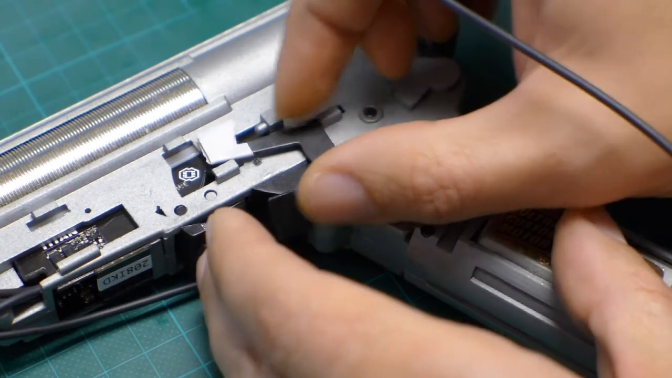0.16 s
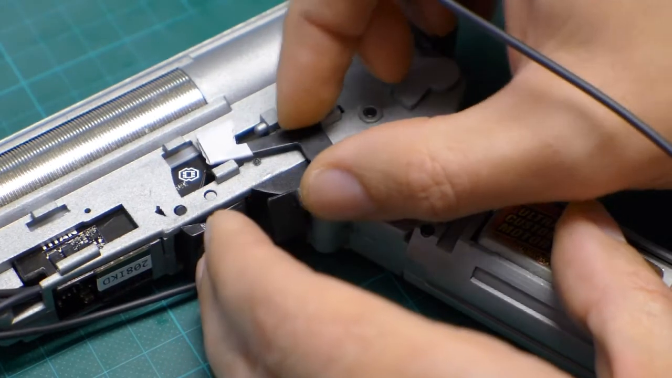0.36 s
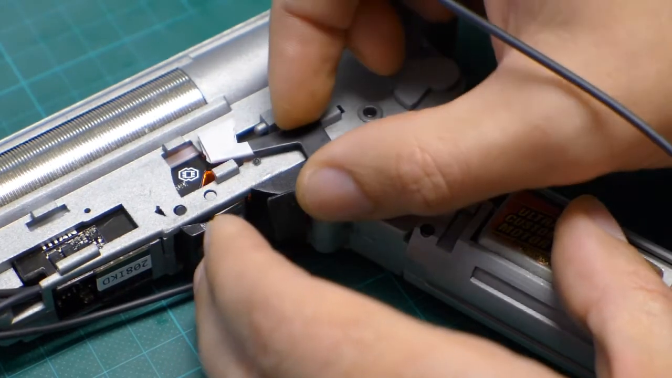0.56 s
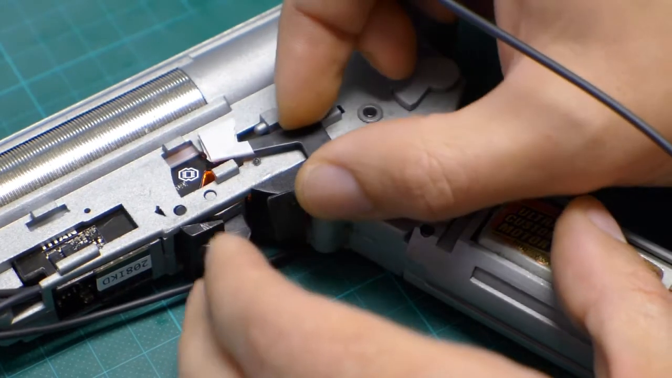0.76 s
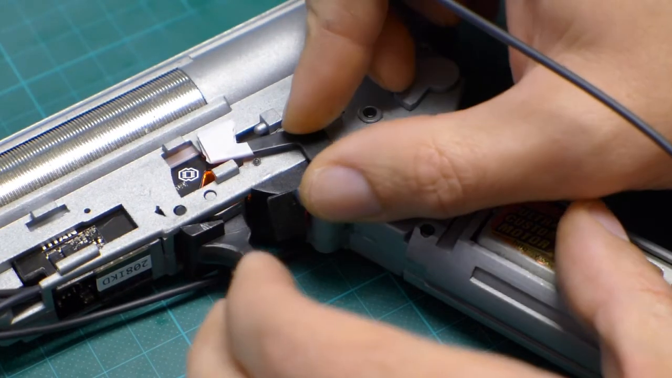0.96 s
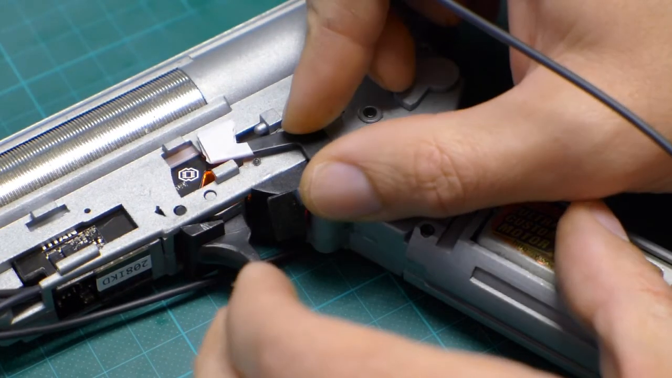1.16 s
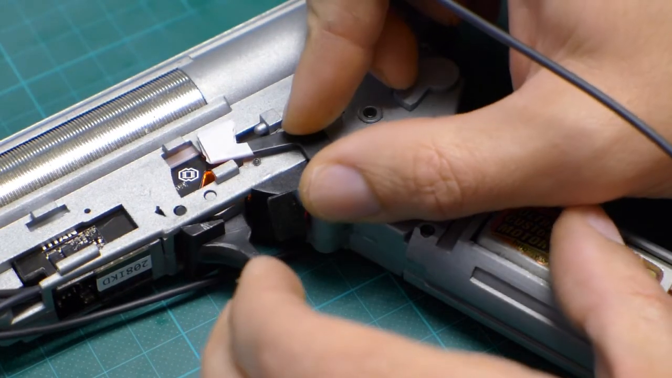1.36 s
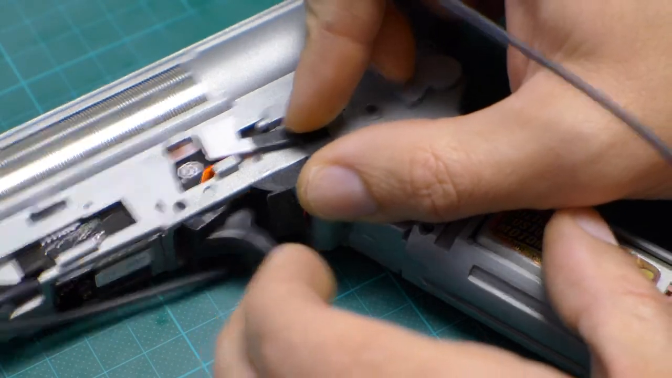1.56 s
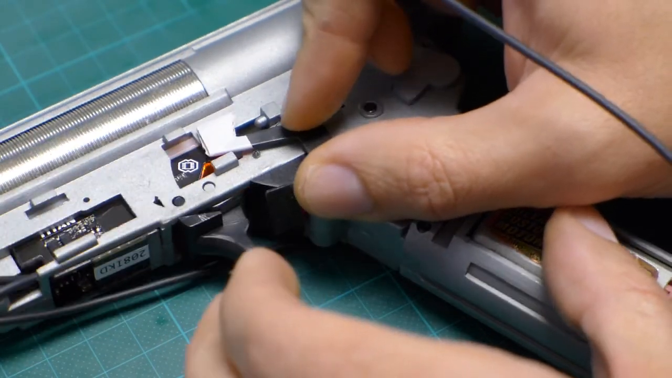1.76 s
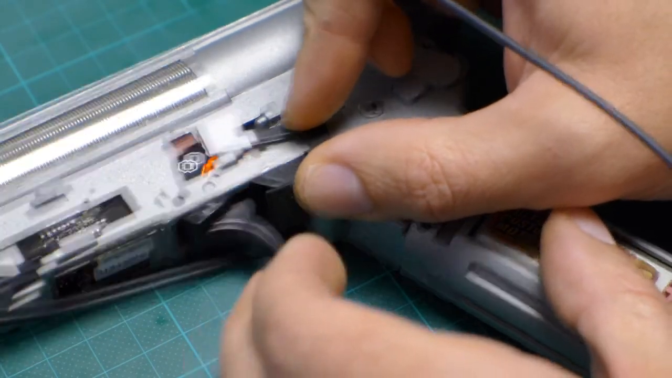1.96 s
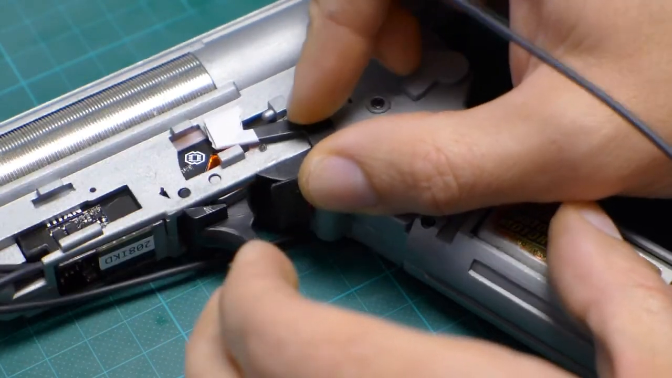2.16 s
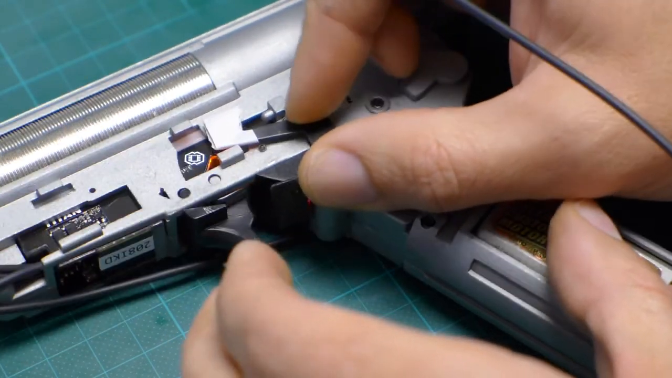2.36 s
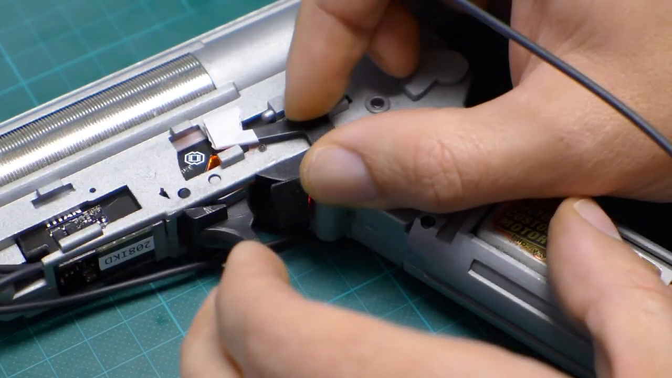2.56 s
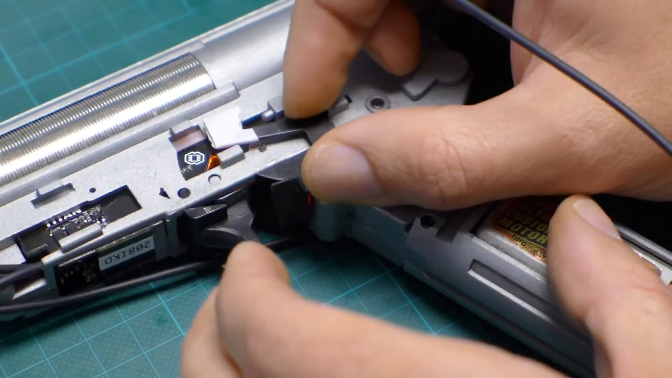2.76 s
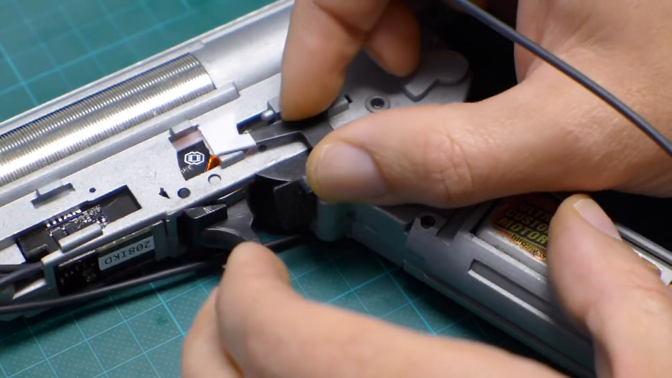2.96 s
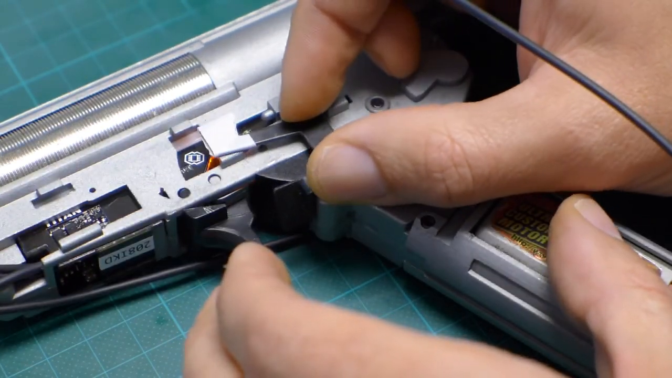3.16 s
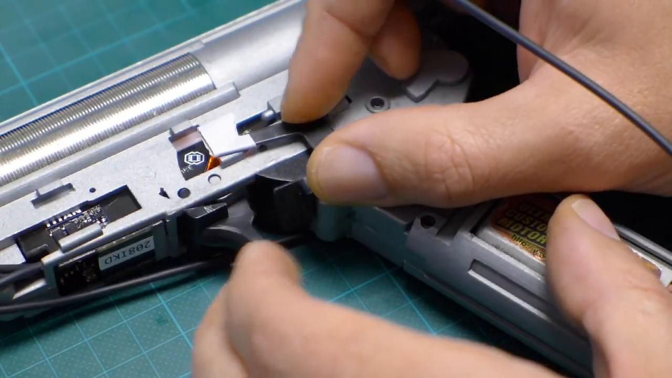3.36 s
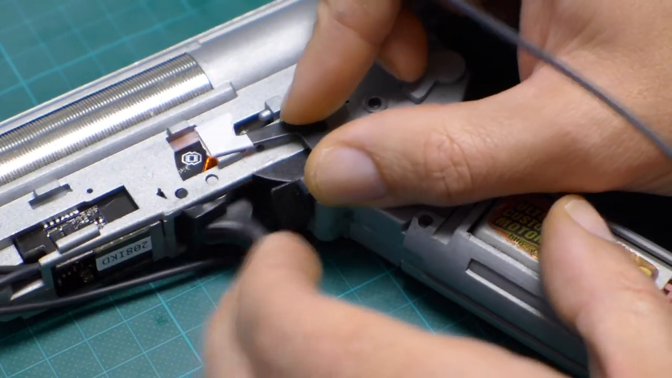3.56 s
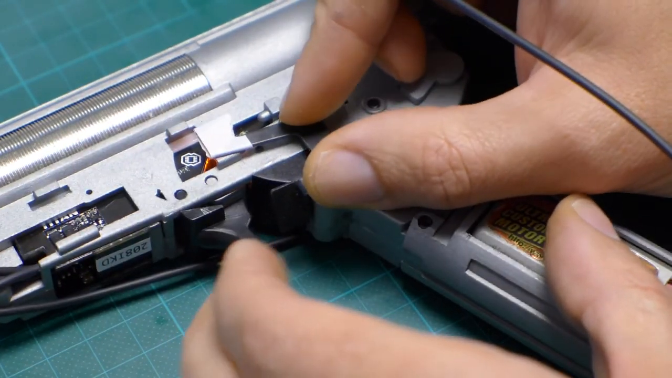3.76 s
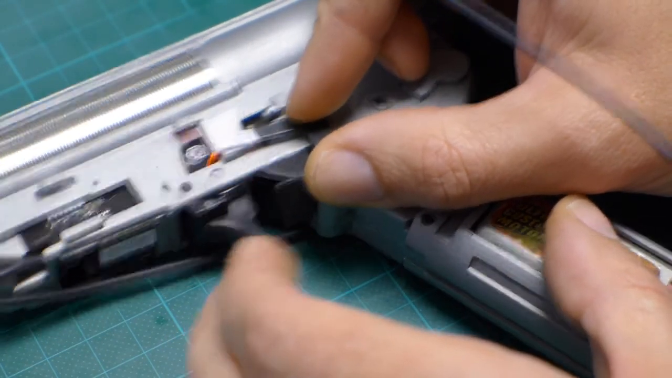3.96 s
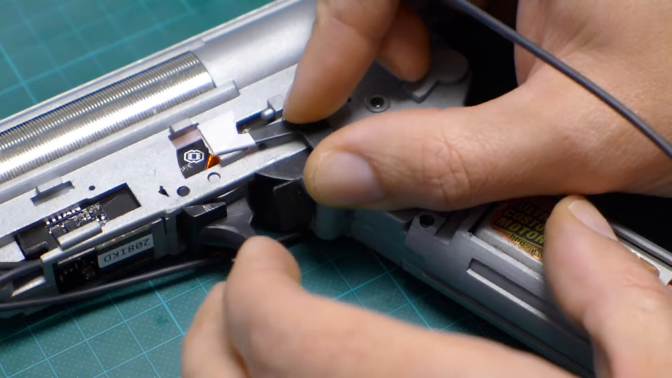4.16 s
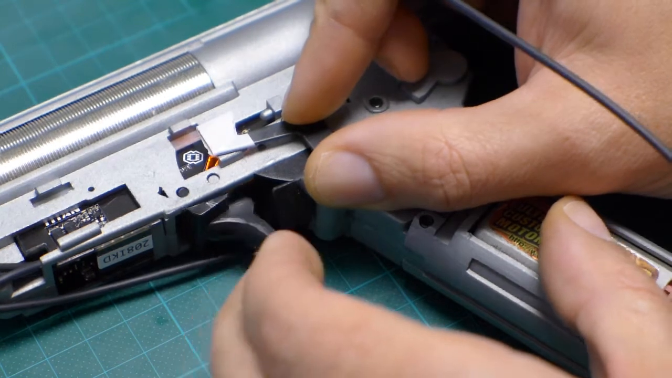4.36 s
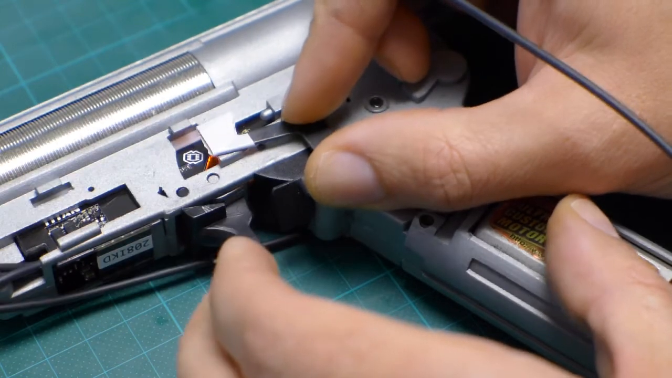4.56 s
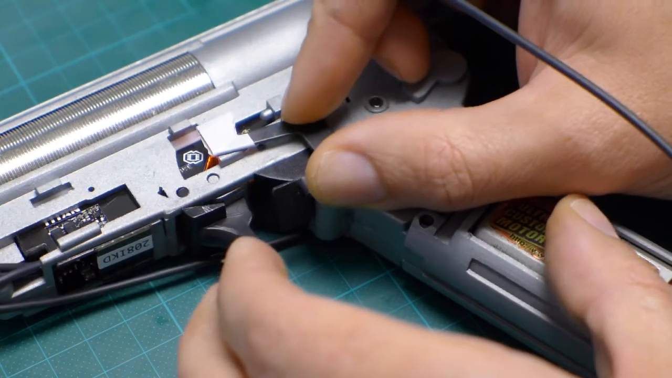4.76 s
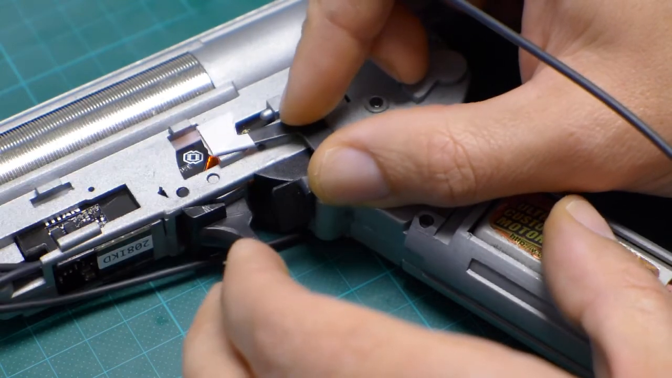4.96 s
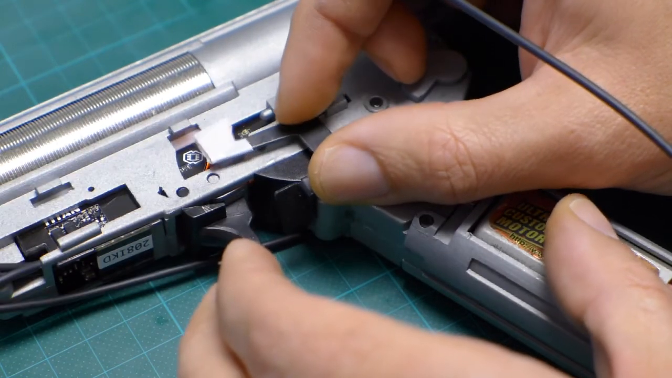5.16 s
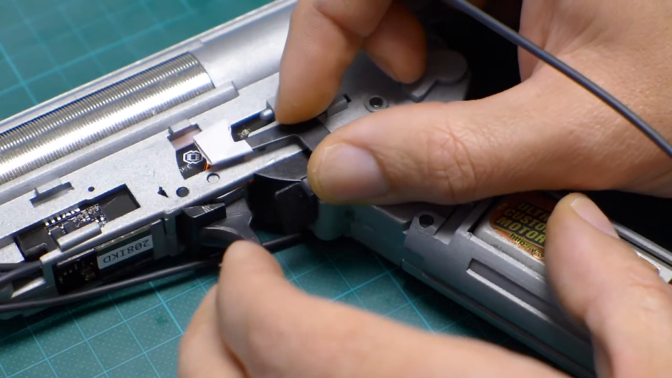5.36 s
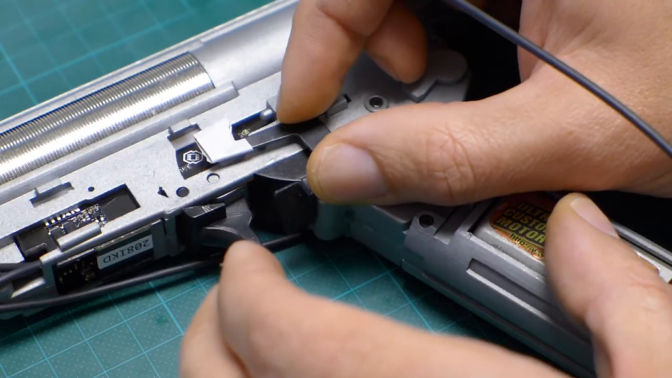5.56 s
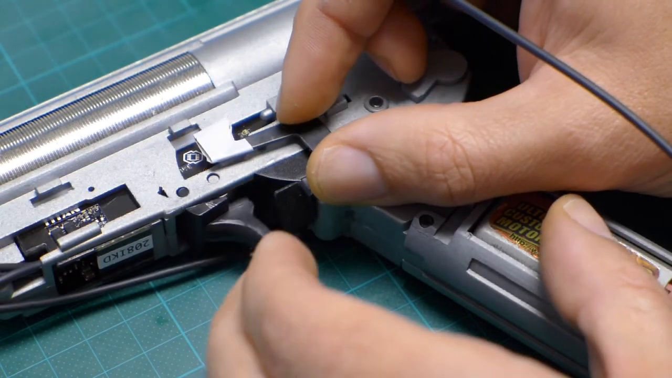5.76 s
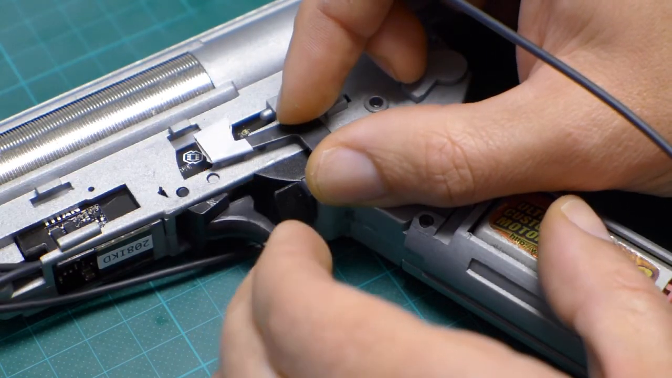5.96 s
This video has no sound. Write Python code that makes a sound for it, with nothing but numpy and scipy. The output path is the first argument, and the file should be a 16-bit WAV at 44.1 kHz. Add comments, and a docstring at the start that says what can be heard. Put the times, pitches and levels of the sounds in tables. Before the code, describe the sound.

A close stereo view of an open toy-gun gearbox in a small hard room, over low air and hiss. At 0.1 s a selector snaps: several gritty clicks with a dull low knock, followed by faint finger rubbing until about 0.8 s. Bursts start at 1.47 and 1.90 s, then, after soft rubbing around 2.7-3.1 s and a light trigger click at 3.34 s, at 3.44, 3.82 and 4.33 s. Each lasts 0.12-0.21 s: an instant rough whir of scraping teeth, one catching clack, then hard metallic slams about 15 per second, three in most bursts or fewer, three at most except a slightly longer second burst. Small rebounds and latch ticks follow each slam. A roughly half-second room tail fades, with faint spring ringing after bursts two and five. The background ducks and recovers. Very faint rubbing at 4.95-5.3 s; two tiny clicks at 5.63 s.

```python
"""Fingers rub and a selector snaps, then a toy gun's open gearbox fires five short bursts in a small hard room.
The gears catch the piston with one clack at the start of each burst, then it slams home about 15 times a second;
a soft trigger click comes before the third burst and two more after the last. Teeth are scraping noise and ticks,
contacts are sharp pushes with a rattle, and the spring is a few fading sines.
An automatic gain control ducks under the shots and creeps back."""
import sys
import numpy as np
from scipy import signal
from scipy.fft import rfft, irfft, next_fast_len
from scipy.io import wavfile
from scipy.ndimage import uniform_filter1d, minimum_filter1d

SR = 44100
rng = np.random.default_rng(int(sys.argv[2]) if len(sys.argv) > 2 else 0)


def store_pcm(level_fs):
    """Save levels as 16-bit WAV."""
    pcm = np.round(np.clip(level_fs, -1, 1) * 32767).astype(np.int16)
    wavfile.write(sys.argv[1], SR, np.atleast_2d(pcm).T)


N = 264291  # length in samples, about 6 seconds

# All dB levels are relative: the parts are mixed and gain-controlled later.
# The trigger is held. Each row: motor on in seconds, motor off in seconds,
# gear level in dB, catch level in dB, slam level in dB.
BURSTS = [(1.4736, 1.625, -8.5, 0, 10), (1.9013, 2.115, -6, 1.5, 12), (3.439, 3.558, -7.5, 1, 15),
          (3.821, 3.972, -6.5, 2.5, 12.5), (4.3252, 4.471, -5.5, -1, 10.5)]
# The trigger is touched or let go. Each row: time in seconds, level in dB, seconds for the rattle to fall 60 dB.
TRIGGER_CLICKS = [(3.3423, -52.5, 0.022), (5.6267, -54, 0.031), (5.64, -57, 0.036)]
# The selector snaps over. Each row: time in seconds, level in dB, seconds for the rattle to fall 60 dB.
SELECTOR_CLICKS = [(0.0986, -47, 0.05), (0.103, -37, 0.016), (0.109, -40.5, 0.14), (0.1258, -40.5, 0.11)]
# Fingers shift on the shell. Each row: start in seconds, length in seconds, level in dB.
RUBS = [(.13, 0.69, -69.5), (2.696, .45, -65.5), (4.947, 0.32, -73)]
# The spring is left singing. Each row: start in seconds, level in dB.
SPRING_RINGS = [(2.111, 3.5), (4.47, -5.5)]
# Long-lasting tones of the spring. Each row: pitch in Hz, level in dB, seconds to fall 60 dB.
SPRING_TONES = [(291, -49, 2.4), (662, -43, 2.3), (996, -50, .8)]
# Resonances of the cast shell. Each row: centre in Hz, width in Hz, peak level in dB.
SHELL_RESONANCES = [(213, 56, 6), (452, 42, 6.5), (617, 41, 3), (720, 28, 4.5), (845, 32, 2.5),
                    (1025, 290, -3.5), (1097, 140, 0.5), (1408, 21, 2), (1915, 30, -0.5), (2280, 320, 0.5),
                    (3669, 42, -1.5), (5030, 490, 4)]

# Tone colours. Each row: frequency in Hz, relative level in dB.
# Room air and microphone hiss:
HISS_COLOUR = [(25, -0.5), (60, 0.5), (90, -5), (120, 1), (170, -7.5), (300, -3.5), (500, -6.5),
               (900, -2.5), (1500, -5.5), (2300, -9.5), (3500, -15), (5200, -13.5), (12000, -20.5),
               (15500, -26.5)]
# Fingers rubbing on the shell:
RUB_COLOUR = [(60, -24), (200, -2.5), (350, -3.5), (600, -9.5), (1000, -10.5), (2000, -20.5), (7000, -24.5),
              (15000, -33)]
# Selector clicks:
SELECTOR_COLOUR = [(60, -17), (200, -14), (400, 1), (700, -2), (1000, 3.5), (1600, -0.5), (2300, 2.5),
                   (3300, -9), (4300, -6), (5300, 5.5), (6700, -11), (7800, -3.5), (11300, -12.5),
                   (15500, -16)]
# Trigger clicks:
TRIGGER_COLOUR = [(60, -24.5), (400, -13), (1100, -1), (2000, -0.5), (3000, 0), (4500, -9), (7000, -17.5),
                  (15000, -26)]
# Gear teeth and light metal contacts:
TEETH_COLOUR = [(40, -39), (100, -30.5), (200, -12.5), (340, -12.5), (560, -14.5), (950, 1.5), (1350, 1),
                (1700, -14.5), (2300, -9.5), (3000, 1.5), (3500, -6), (4400, -5), (5300, 0), (7500, -2),
                (11500, -7.5), (14000, -14), (16000, -29)]
# Heavy blows of the piston:
THUD_COLOUR = [(30, -29.5), (100, -36.5), (170, -12.5), (330, -10.5), (480, -4), (900, 1), (1500, -6.5),
               (2100, -5), (2900, -9.5), (4800, -6), (6500, -24), (11000, -29.5), (15500, -38.5)]
# Sound coming back from the room's walls:
WALL_COLOUR = [(60, -21.5), (110, -6.5), (155, 5), (380, -2), (700, 2.5), (1000, 1), (1500, -0.5),
               (1950, 4), (2400, 3.5), (2850, -5), (3450, 6), (4200, 0), (5200, 1), (14000, 2)]

# How the room's tail dies away. Each row: frequency in Hz, seconds to fall 60 dB.
ROOM_DECAY = [(150, .66), (400, .55), (900, .55), (2100, .58), (3000, .51), (5000, .53), (8000, .42),
              (11000, .33), (15000, .26)]
# Nearby surfaces. Each row: delay in seconds, left gain, right gain (plain factors).
ECHOES = [(.0022, 0.2, 0.17), (.00425, 0.23, 0.18), (.0072, .1, .18)]
# Likeness of left and right (1 is the same, 0 unrelated, -1 opposite). Each row: frequency in Hz, likeness.
# Contacts and scraping teeth:
NEAR_ALIKE = [(100, 0.72), (600, 1), (1200, 0.17), (5000, .86), (12000, 0.28)]
# Room tail and finger rubs:
FAR_ALIKE = [(40, .7), (150, 0.88), (500, 0.94), (1200, 1), (3000, 0.92), (6000, 0.51), (12000, 0.35)]
# Room air and hiss:
AIR_ALIKE = [(60, .85), (200, 0.96), (400, .35), (700, -0.62), (1300, -0.74), (2400, -0.67), (8000, .3)]
# Balance of everything but the background. Each row: frequency in Hz, left minus right in dB.
BALANCE_DB = [(200, 1), (600, 0.65), (1300, -3.5), (2500, -1.65), (5500, -2), (12000, -0.65)]

TOP_HZ = 15250  # upper band limit
# Firing cycle: motor on to first slam, gears catching the piston to that slam, slam to slam
FIRST_SHOT_S, DRAW_S, CYCLE_S = .07, .0558, .0677
# The rack knocks as it lets go (relative to the slam), weaker with each further shot of a burst
KNOCK_DB, KNOCK_LOSS_DB_PER_SHOT = -12, 9
LOUDER_DB_PER_SHOT = 0.04  # later slams of a burst are very slightly louder
# The starting motor jolts the slack out of the gears: delay and level
JOLT_S, JOLT_DB = .004, -9.5
# Each rub swells and fades; the resting grip never goes quite silent
RUB_ATTACK_S, RUB_RELEASE_S, GRIP_DB = 0.033, 0.067, -66.5


def amp(db):
    """Turn decibels into a gain factor."""
    return 10 ** (np.asarray(db) / 20)


def unit(x):
    """Scale to an rms (average strength) of 1."""
    return x / np.sqrt(np.mean(x ** 2) + 1e-20)


def along(points, hz):
    """Read a (Hz, value) table at any frequency, on a log axis."""
    f, v = np.transpose(points)
    return np.interp(np.log(hz + 1), np.log(f), v)


def add(track, s, sound):
    """Mix a sound into a track from time s (seconds) on."""
    part = track[..., round(s * SR):][..., :sound.shape[-1]]
    part += sound[..., :part.shape[-1]]


def filtered(x, response):
    """Multiply the spectrum of x by a response that depends on frequency."""
    size = 2 * next_fast_len(x.shape[-1] // 2 + SR // 8)
    hz = np.fft.rfftfreq(size, 1 / SR)
    return irfft(rfft(x, size) * response(hz), size)[..., :x.shape[-1]]


def causal(gain):
    """Give a gain curve unit power and the phase that makes it ring only after a blow."""
    cepstrum = irfft(np.log(np.maximum(unit(gain), 1e-6)))
    half = len(cepstrum) // 2
    # fold the backward-in-time half onto the forward half
    cepstrum[1:half] *= 2
    cepstrum[half + 1:] = 0
    return np.exp(rfft(cepstrum))


def coloured(force, colour):
    """A force heard through the tone colour of the part that it strikes."""
    return filtered(force, lambda hz: causal(amp(along(colour, hz))))


def stereo_noise(alike, size):
    """White noise at two microphones; the blend of mid and side sets how alike they are."""
    def mid_side(hz):
        angle = np.arccos(np.clip(along(alike, hz), -1, 1)) / 2
        return np.array([np.cos(angle), np.sin(angle)])

    mid, side = filtered(rng.standard_normal((2, size)), mid_side)
    return np.array([mid + side, mid - side])


def background(level_db=-60):
    """Steady noise for room air and microphone hiss, plus noise that swells as fingers rub the shell."""
    air = unit(filtered(stereo_noise(AIR_ALIKE, N), lambda hz: amp(along(HISS_COLOUR, hz))))
    rub = unit(filtered(stereo_noise(FAR_ALIKE, N), lambda hz: amp(along(RUB_COLOUR, hz))))
    t = np.arange(N) / SR
    strokes = np.zeros(N)
    for s, length, db in RUBS:
        swell = 1 - np.exp(-np.maximum(t - s, 0) / RUB_ATTACK_S)
        fade = np.exp(-np.maximum(t - s - length, 0) / RUB_RELEASE_S)
        strokes += amp(db) * swell * fade
    return amp(level_db) * air + (amp(GRIP_DB) + strokes) * rub


def blows(rows, push, rattle_db, rattle_t60):
    """Each (seconds, dB) contact is one sharp push and a fading rattle of loose parts, cut off after 0.1 s."""
    force, t = np.zeros((2, N)), np.arange(SR // 10) / SR
    for s, db in rows:
        blow = stereo_noise(NEAR_ALIKE, len(t)) * amp(-60 * t / rattle_t60)
        blow *= amp(rattle_db) / np.linalg.norm(blow[0])
        blow[:, 0] += push
        add(force, s, amp(db) * np.sqrt(SR * .002) * blow)
    return force


def gritty_clicks(rows):
    """Small contacts with more rattle than push, each dying at its own speed."""
    return sum(blows([(s, db)], push=0.17, rattle_db=5, rattle_t60=t60) for s, db, t60 in rows)


def trigger(knock_hz=205, knock_db=-43):
    """Small gritty clicks of selector and trigger; the selector also knocks the shell on the bench."""
    selector = coloured(gritty_clicks(SELECTOR_CLICKS), SELECTOR_COLOUR)
    sound = selector + coloured(gritty_clicks(TRIGGER_CLICKS), TRIGGER_COLOUR)
    t = np.arange(SR // 2) / SR
    knock = (1 - np.exp(-t / .006)) * amp(-60 * t / .22) * np.sin(2 * np.pi * knock_hz * t)
    add(sound, SELECTOR_CLICKS[-1][0], amp(knock_db) * knock)
    return sound


def gears(spin_up_s=0.0085, run_down_s=0.0067, pinion_hz=2280, rack_hz=212, rough=.35,
          tooth_db=-7, rack_db=-24, clatter_db=2, inrush_db=1.0):
    """Pinion teeth tick and scrape as the motor turns; the slow rack teeth load them and shake the shell."""
    force, t = np.zeros((2, N)), np.arange(SR // 2) / SR
    shake = np.zeros(N)
    for on, off, db, *_ in BURSTS:
        # speed is a share of full speed; travel is the seconds' worth of full-speed turning so far
        speed = (1 - np.exp(-t / spin_up_s)) * np.exp(-np.maximum(t - off + on, 0) / run_down_s)
        travel = np.cumsum(speed) / SR
        # every tooth lands a little early or late, with its own strength
        marks = np.arange(1, 600) + rough * .5 * rng.standard_normal(599)
        times = np.interp(marks / pinion_hz, travel, t)
        sizes = np.exp(rough * rng.standard_normal(len(marks))) * (times < t[-1])
        teeth = np.bincount((times * SR).astype(int), sizes, len(t)) * np.sqrt(SR / pinion_hz)
        teeth -= uniform_filter1d(teeth, size=200)
        scrape = stereo_noise(NEAR_ALIKE, len(t))
        rack = np.sin(2 * np.pi * rack_hz * travel)
        # louder under each rack tooth, and at the motor's first inrush of current
        load = amp(clatter_db * rack + inrush_db * np.exp(-t / .15))
        add(force, on, amp(db) * speed * load * (scrape + amp(tooth_db) * teeth))
        add(shake, on, amp(db + rack_db) * speed ** 2 * rack)
    return coloured(force, TEETH_COLOUR) + shake


def slams():
    """The piston fires once a cycle while the motor runs: rows of (seconds, slam dB, rack knock dB)."""
    rows = []
    for on, off, *_, db in BURSTS:
        for shot, s in enumerate(np.arange(on + FIRST_SHOT_S, off, CYCLE_S)):
            knock_db = KNOCK_DB - KNOCK_LOSS_DB_PER_SHOT * shot  # relative to the slam
            rows.append((s, db + LOUDER_DB_PER_SHOT * shot, knock_db))
    return rows


def piston(flight_s=0.0032, rebound_s=.0023, rebound_db=-6, rebound_loss_db=3.5, release_db=-6.5,
           catch_bright_db=-8, latch_delay_s=0.022, latch_db=-13):
    """Gears jolt and catch the rack; it slips off the last tooth and the piston hits the head and rebounds."""
    shots = slams()
    # one jolt and one catch at the start of each burst
    jolts = [(on + JOLT_S, JOLT_DB) for on, *_ in BURSTS]
    catches = [(on + FIRST_SHOT_S - DRAW_S, db) for on, _, _, db, _ in BURSTS]
    catch_scrapes = [(s - .002, db + catch_bright_db) for s, db in catches]
    jolt = blows(jolts, push=.2, rattle_db=-2, rattle_t60=.035)
    catch = blows(catches, push=1.0, rattle_db=-5, rattle_t60=0.0099)
    scrape = blows(catch_scrapes, push=0, rattle_db=4.0, rattle_t60=0.018)

    # every shot: let go, slide, slam, three weakening rebounds
    releases = [(s - flight_s, db + knock) for s, db, knock in shots]
    slides = [(s - flight_s, db + release_db) for s, db, _ in shots]
    rebounds = [(s + rebound_s * (k + 1), db + rebound_db - rebound_loss_db * k)
                for s, db, _ in shots for k in range(3)]
    let_go = blows(releases, push=0.57, rattle_db=-3, rattle_t60=0.0091)
    slide = blows(slides, push=0, rattle_db=0.5, rattle_t60=0.3)
    slam = blows([(s, db) for s, db, _ in shots], push=1, rattle_db=-6, rattle_t60=.04)
    bounce = blows(rebounds, push=0.23, rattle_db=-2.5, rattle_t60=0.018)

    # the latch that stops the gears from running back drops in a moment later
    latches = [(s + latch_delay_s, db + latch_db) for s, db, _ in shots]
    latch = blows(latches, push=0.71, rattle_db=-4.0, rattle_t60=0.012)
    heavy = jolt + catch + let_go + slam + bounce
    light = scrape + slide + latch
    return coloured(heavy, THUD_COLOUR) + coloured(light, TEETH_COLOUR)


def shell(x, ring_db):
    """The resonances of the cast shell stand out of the sound that it radiates."""
    def response(hz):
        peaks = sum(amp(db + ring_db) / (1 + (2 * (hz - centre) / width) ** 2)
                    for centre, width, db in SHELL_RESONANCES)
        return causal(1 + peaks)

    return filtered(x, response)


def nearby(x):
    """The bench and things on it throw the sound back within milliseconds."""
    out = x.copy()
    for delay, left, right in ECHOES:
        add(out, delay, x * [[left], [right]])
    return out


def room(x, gap_s=.008, build_s=0.0048):
    """A diffuse noise tail in which each frequency dies at its own speed, drawn afresh for every burst."""
    wet = np.zeros((2, N))
    edges = [0] + [round(on * SR) for on, *_ in BURSTS] + [N]
    for first, last in zip(edges, edges[1:]):
        hz, t, z = signal.stft(stereo_noise(FAR_ALIKE, SR), SR, nperseg=256)
        decay = amp(-60 * t / along(ROOM_DECAY, hz)[:, None])
        build_up = 1 - np.exp(-t / build_s)
        tail = signal.istft(z * decay * build_up, SR, nperseg=256)[1]
        tail /= np.linalg.norm(tail[0])
        add(wet, first / SR + gap_s, signal.fftconvolve(x[:, first:last], tail, axes=1))
    return coloured(wet, WALL_COLOUR)


def spring():
    """The spring sings on faintly once the piston rests: a few fading sines."""
    ring, t = np.zeros(N), np.arange(2 * SR) / SR
    for s, db in SPRING_RINGS:
        for hz, level_db, t60 in SPRING_TONES:
            add(ring, s, amp(db + level_db - 60 * t / t60) * np.sin(2 * np.pi * hz * t))
    return ring


def scene():
    """Gearbox and trigger on the bench, with the room around them."""
    clicks, drive, shots = trigger(), gears(), piston()
    direct = nearby(amp(-4.5) * shell(drive, ring_db=-1) + amp(-2) * shell(shots, ring_db=-6.0))
    # the room gathers sound from all sides of the shell, which evens out its resonances
    to_room = shell(amp(-12.5) * drive + amp(-6.5) * shots, ring_db=-13)
    wet = room(to_room + amp(-12) * clicks)
    sound = direct + wet + clicks + spring()
    # half of the balance goes to each side
    balanced = filtered(sound, lambda hz: amp(np.outer([.5, -.5], along(BALANCE_DB, hz))))
    return balanced + background()


def lag(v, seconds):
    """Follow a value smoothly, with this time constant."""
    step = 1 / (seconds * SR)
    return signal.lfilter([step], [1, step - 1], v)


def gain_control(x, limit_db=-7.5, hold_s=.1, release_db_per_s=60, attack_s=.0008, memory_s=1.03):
    """Loud sound pulls the gain down almost at once; it waits, recovers quickly part way, then creeps back."""
    t = np.arange(N) / SR
    power = np.abs(uniform_filter1d(np.mean(x ** 2, axis=0), size=132))  # averaged over 3 ms
    excess = np.maximum(10 * np.log10(power + 1e-12) - limit_db, 0)
    # hold the largest excess of the last moments
    half = int(hold_s * SR / 2)
    held = -minimum_filter1d(-excess, 2 * half + 1, origin=half, mode="constant")
    # then let it fall by a fixed number of dB a second
    fall = release_db_per_s * t
    fast = np.maximum.accumulate(held + fall) - fall
    # the slow memory takes over once the fast part has dropped below it
    return x * amp(-np.maximum(lag(fast, attack_s), lag(fast, memory_s)))


def record(dry):
    """Gain control, soft clipping between two gentle bass cuts, a band limit and the converter's small offset."""
    bass_cut = signal.butter(1, 95, "high", fs=SR, output="sos")
    x = signal.sosfilt(bass_cut, gain_control(dry))
    clipped = x / (1 + np.abs(x / .94) ** 6) ** (1 / 6)  # levels off near full scale
    x = signal.sosfilt(bass_cut, clipped)
    return filtered(x, lambda hz: 1 / np.sqrt(1 + (hz / TOP_HZ) ** 220)) - .0028


dry = scene()
out = record(dry)
store_pcm(out)
```